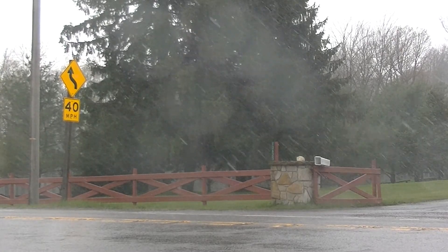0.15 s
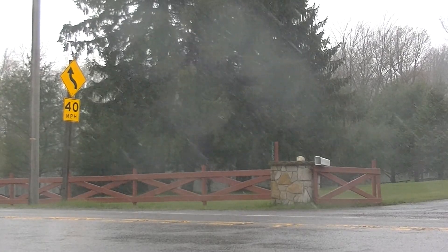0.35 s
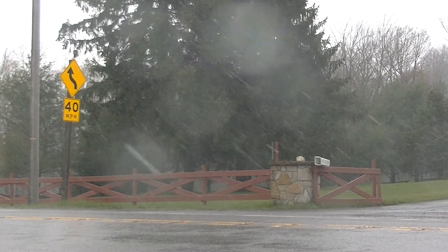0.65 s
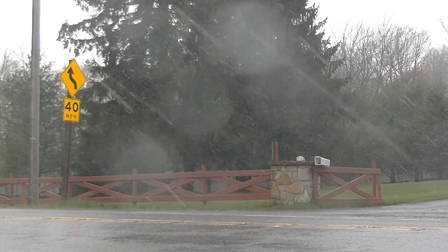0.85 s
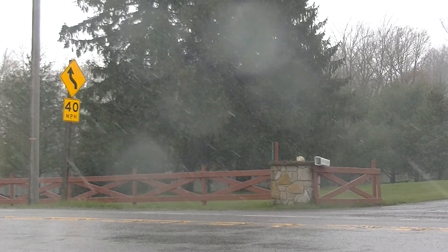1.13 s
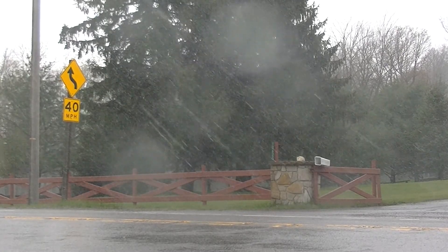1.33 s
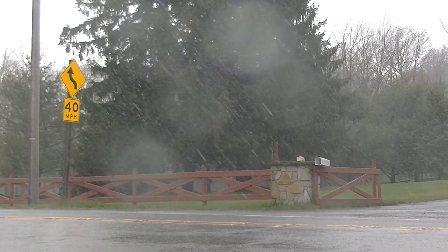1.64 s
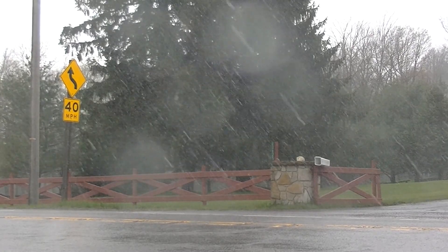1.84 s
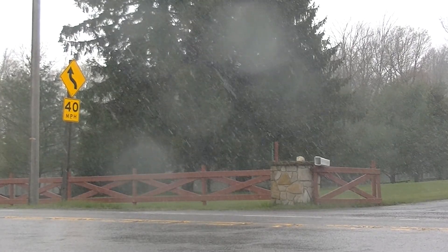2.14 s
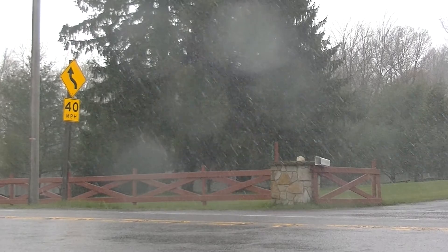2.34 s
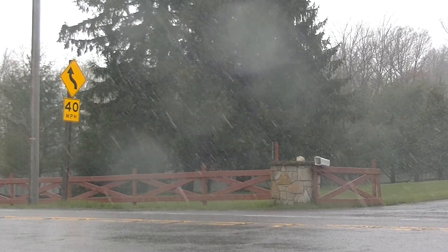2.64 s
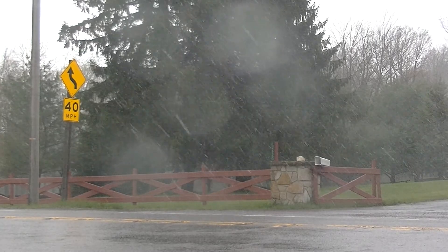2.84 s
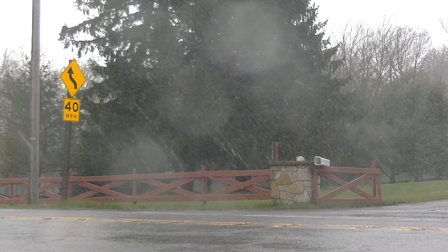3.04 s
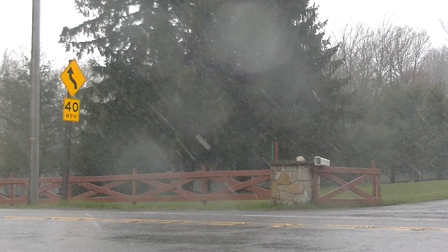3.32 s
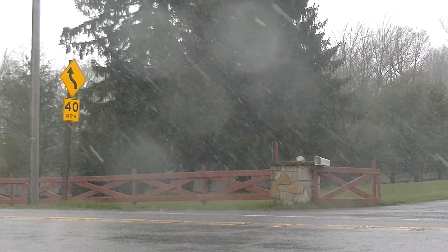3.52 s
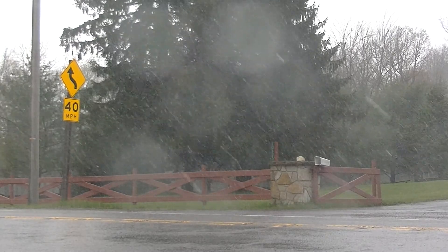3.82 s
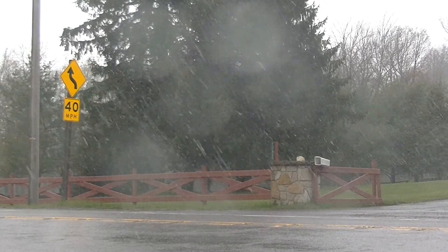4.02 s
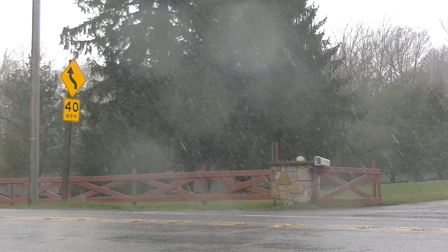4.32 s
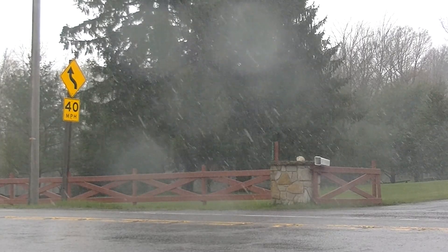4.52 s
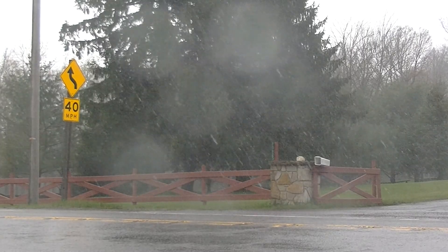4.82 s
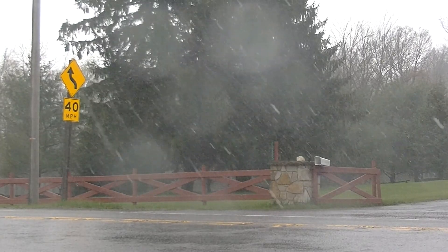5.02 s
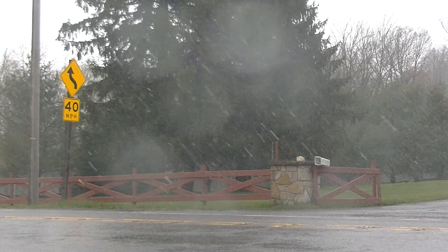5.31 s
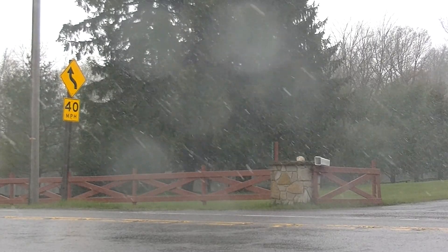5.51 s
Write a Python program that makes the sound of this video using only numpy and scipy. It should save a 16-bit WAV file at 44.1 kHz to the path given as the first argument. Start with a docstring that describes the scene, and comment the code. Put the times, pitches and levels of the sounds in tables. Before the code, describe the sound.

Icy pellets tick sharply and irregularly close to the microphone over a steady hiss of falling sleet, with buffeting wind fading early.

```python
"""Graupel beside a country road

Icy pellets, made of short coloured noise bursts, tick on and around the camera, mostly to its right.
Flurries of tiny ticks are fine crumbs; damped grainy pats are wet clumps and low bumps of wind.
Steady noise is the far fall; fluttering noise is a gust across the microphone ports that dies away.
Later a low distant rush comes up. Softer taps, a gritty rustle, a deep rumble and a brief hum fill in.
The recorder's gain control ducks for a moment after loud ticks, chopping the wind."""
import sys
import numpy as np
from scipy import signal
from scipy.fft import rfft, irfft, next_fast_len
from scipy.io import wavfile
from scipy.ndimage import uniform_filter1d, minimum_filter1d, map_coordinates

SR = 44100
rng = np.random.default_rng(int(sys.argv[2]) if len(sys.argv) > 2 else 0)


def dump(signal):
    """Clip the signal to [-1, 1] and save it as 16-bit WAV at the path in sys.argv[1]."""
    limited = np.clip(np.atleast_2d(signal).T, -1, 1)
    pcm = np.round(limited * 32767).astype(np.int16)
    wavfile.write(sys.argv[1], SR, pcm)


N = 249606  # length of the scene in samples

# Levels in the tables are before any trim; levels in the (frequency, level) tables are relative.
# far hiss of the fall: (time [s], level [dB])
FALL_LEVEL = [(0, -42), (1.8, -40.5), (2.3, -42.5), (4.2, -44), (4.8, -43), (5.28, -42.5), (5.42, -39.5),
              (5.54, -44.5)]
# colour of the far hiss: (frequency [Hz], level [dB])
HISS_COLOUR = [(100, -11), (300, -5), (500, 4), (1100, 4.5), (1600, 6.5), (2200, 5), (3000, 6), (4600, 6),
               (6100, 0), (7300, -9), (10000, -10.5), (16000, -12.5)]
# how alike left and right are, 1 = the same: (frequency [Hz], likeness [0 to 1])
LEFT_RIGHT_LIKENESS = [(1500, 0.9), (3000, 0.57), (5000, 0.36), (8000, 0.3), (11000, 0.12), (15000, 0.042)]
# strength of the gust: (time [s], level [dB])
WIND_LEVEL = [(0, -34.5), (.1, -27.5), (.19, -35.5), (.38, -27), (.485, -38), (.65, -31.5), (1.17, -34.5),
              (1.4, -28.5), (1.7, -38.5), (2.1, -45), (2.4, -45.5)]
# hard puffs within the gust: (middle [s], length [s], level [dB])
PUFFS = [(.085, 0.11, -30), (.136, 0.05, -22.5), (.243, 0.054, -21.5), (.308, 0.059, -20),
         (.422, 0.044, -23), (.458, 0.037, -24), (.513, 0.029, -22.5), (.562, 0.035, -24), (.618, .02, -27),
         (.665, 0.0088, -29.5), (.857, 0.047, -25.5), (.945, 0.032, -27), (1.064, 0.048, -21),
         (1.105, 0.036, -27), (1.275, 0.08, -27), (1.41, 0.042, -27.5), (1.457, 0.028, -23),
         (1.52, 0.013, -23.5), (1.615, 0.026, -30.5), (1.785, 0.06, -35.5), (2.062, 0.023, -34)]
# colour of the gust's blustering air: (frequency [Hz], level [dB])
BLUSTER_COLOUR = [(40, -63), (140, -33), (240, -15), (380, -4), (520, 0.5), (680, 0.5), (850, -4),
                  (1150, -9), (2000, -16), (3200, -24.5), (5000, -33), (8000, -56)]
# colour of the turbulence in the hardest puffs: (frequency [Hz], level [dB])
RASP_COLOUR = [(60, -44), (160, 0), (500, 4), (1500, 9), (2800, 3.5), (6000, -40), (10000, -47)]
# distant rush: (time [s], level [dB])
RUSH_LEVEL = [(0, -55), (1.8, -69), (2.2, -63), (4.1, -55), (4.26, -39.5), (4.38, -49.5), (4.8, -44.5),
              (5.2, -45.5), (5.66, -50)]
# colour of the distant rush: (frequency [Hz], level [dB])
RUSH_COLOUR = [(30, -22), (100, -8.5), (220, -1.5), (380, -1.5), (650, -6), (1100, -12.5), (2500, -85),
               (6000, -60)]
# deep rumble of moving air: (time [s], level [dB])
RUMBLE_LEVEL = [(0, -51), (.28, -50), (.34, -81), (1, -68), (1.06, -56), (1.95, -64), (2.1, -54.5),
                (2.45, -60.5), (2.7, -56), (3.05, -57), (3.4, -64.5), (4.7, -53), (5.66, -62)]
# colour of the deep rumble: (frequency [Hz], level [dB])
RUMBLE_COLOUR = [(10, -38), (25, -22), (38, -1.5), (60, -10), (90, -8), (160, -13), (500, -42)]
# showers of fine crumbs: (middle [s], length [s], level [dB])
SHOWERS = [(.61, .1, -43), (.8, .06, -39.5), (.95, .14, -38), (1.06, .07, -39.5), (1.27, .12, -38),
           (2.48, .16, -50), (2.81, .12, -43), (3.18, .14, -46), (3.62, .16, -45.5)]
# close pellets; level is over 1 ms, ring pitch belongs to the landing spot:
# (time [s], level [dB], brightness [dB per octave], crush time [s], ring pitch [Hz])
PELLETS = [(0.0242, -21, 2, 0.0025, 2380), (0.1574, -11.5, 5.5, 0.0007, 3500),
           (0.1689, -12, 5, 0.0013, 7680), (0.2027, -11.5, 3.5, 0.00016, 5060),
           (0.2191, -10, 4.5, 0.00078, 4940), (0.2612, -15, 3.5, 0.0015, 2330),
           (0.4446, -19, -1, 0.0016, 2320), (0.495, -20, -3, 0.001, 4400.0),
           (0.5094, -15.5, 3.5, 0.00072, 9300), (0.574, -12, 5.5, 0.0025, 3250),
           (0.6, -12.0, 3.5, 0.0008, 5960), (0.6276, -10, 4.5, 0.0013, 3380),
           (0.6585, -14, 5.5, 0.00018, 5940), (0.719, -18, -1, 0.0019, 2670),
           (0.7768, -16.5, 3, 0.0017, 2400.0), (0.781, -10.5, -3.5, 0.0027, 5560),
           (0.7865, -4.5, 8, 0.00071, 2400), (0.866, -9.5, 1, 0.0018, 6160),
           (0.878, -11, 7.5, 0.0017, 6800), (0.881, -6.5, 9.5, 0.000099, 7040),
           (0.9064, -17, 3, 0.0026, 3200.0), (0.9203, -20, 8, 0.00095, 2500),
           (0.928, -17, 7, 0.00067, 5250), (0.938, -15.5, 5, 0.00061, 2500.0),
           (0.95, -17.5, 7, 0.0026, 2600.0), (0.9566, -13, 6, 0.0018, 2510),
           (0.9626, -10.5, 4, 0.00023, 6200.0), (1.0004, -13, 9, 0.000096, 9050),
           (1.0129, -12, -2, 0.0018, 2300), (1.0198, -12, -1, 0.00061, 4200.0), (1.03, -6, 2, 0.0016, 3020),
           (1.0346, -9, -5, 0.0011, 3600), (1.0569, -13, 6, 0.0013, 2300.0),
           (1.0784, -20.0, -7, 0.0014, 9900.0), (1.1068, -19, 3, 0.0014, 7600),
           (1.1588, -11, 0.0, 0.0017, 8260), (1.1979, -13.0, 7, 0.0002, 3200.0),
           (1.236, -13, -5.5, 0.0014, 7550), (1.242, -10.5, 0, 0.0012, 6800),
           (1.2545, -15, 5, 0.00089, 2420), (1.2692, -17.5, 2, 0.0015, 2400.0),
           (1.288, -9.5, 0, 0.0012, 5340), (1.3075, -4.5, 2, 0.00021, 5060),
           (1.3264, -7.5, -6, 0.00038, 2900), (1.3409, -4, 0.5, 0.0016, 6800),
           (1.433, -11.5, -6.5, 0.00059, 5940), (1.4848, -24, 23, 0.00057, 8000),
           (1.5542, -16.5, 1.5, 0.0014, 2390), (1.5585, -15, 6, 0.0012, 2980),
           (1.5692, -17, 7, 0.0014, 6500.0), (1.601, -19.5, 1, 0.0016, 3050),
           (1.6333, -12.0, 2.5, 0.00011, 3800), (1.6409, -8.5, 3, 0.00038, 7760),
           (1.731, -14, 8, 0.00018, 2400), (1.7797, -16, 8, 0.0014, 8700),
           (2.157, -21.5, 2.5, 0.0004, 2400.0), (2.2608, -14.5, 7.5, 0.0018, 2510),
           (2.2892, -11.5, 5.5, 0.0011, 3600), (2.2948, -7, -3, 0.00061, 2540),
           (2.314, -15.5, 3, 0.00035, 7800), (2.38, -16, 1.5, 0.0012, 3500.0),
           (2.4058, -15.0, 2.5, 0.00012, 2280), (2.4389, -13, 0, 0.00062, 3540),
           (2.4638, -19.5, 7, 0.0013, 2800), (2.4963, -7.5, -0.5, 0.00023, 3200),
           (2.5125, -17, 1, 0.0014, 2290), (2.5234, -14.0, 2, 0.000083, 3780),
           (2.5677, -11.5, 0.5, 0.00036, 9300), (2.6394, -6.5, -1, 0.00062, 2800),
           (2.6656, -21, -2, 0.00046, 4040), (2.707, -22.5, -2, 0.00064, 4740),
           (2.771, -12.5, -4.5, 0.00038, 3150), (2.7794, -21, 3, 0.0016, 2300.0),
           (2.79, -21.0, -5, 0.0018, 4000.0), (2.8135, -21.5, 9, 0.0006, 6200.0),
           (2.847, -16, 4, 0.0018, 6500.0), (2.871, -9.0, -1.5, 0.000091, 5300),
           (2.8952, -15, 15.5, 0.001, 2700.0), (2.9656, -14, 9, 0.00023, 2640),
           (3.0615, -13, 3, 0.0014, 2200), (3.1198, -17.5, 3, 0.0019, 4000.0),
           (3.1307, -12, 6.5, 0.001, 8700.0), (3.1352, -6, -4, 0.00046, 5600),
           (3.1571, -13.0, 6, 0.00012, 3370), (3.1773, -12.5, 7, 0.0001, 6500.0),
           (3.194, -20.5, 4, 0.0007, 5070), (3.2052, -14.5, 4, 0.00012, 2320),
           (3.2301, -20.5, 8, 0.00065, 10800.0), (3.2429, -10.5, 2.5, 0.00034, 3020),
           (3.2471, -17.5, -5, 0.0011, 8400.0), (3.3083, -12, 2, 0.00015, 6360),
           (3.3382, -12.5, 1.5, 0.00075, 2490), (3.343, -6.5, -3, 0.00009, 4170),
           (3.3838, -15.5, 2.5, 0.001, 3160), (3.4504, -21.5, -2.5, 0.00067, 11000),
           (3.474, -15.5, 11, 0.0016, 2510), (3.5529, -22.5, 0, 0.0012, 3430),
           (3.5855, -8.5, -0.5, 0.00093, 3000), (3.592, -20.0, 19, 0.00018, 3200.0),
           (3.6121, -19.5, -1, 0.00048, 8400.0), (3.6204, -15.5, -5.5, 0.0013, 8000.0),
           (3.627, -15, 5, 0.00012, 2300.0), (3.6919, -19.5, 5, 0.0019, 2500),
           (3.7236, -15.5, 3.5, 0.0025, 4800.0), (3.743, -11, -1, 0.00017, 3150),
           (3.7973, -19, 0, 0.0013, 2400), (3.806, -18, 2, 0.002, 3900),
           (3.8211, -18.5, 5.5, 0.00089, 2320), (3.907, -16, 11.5, 0.00049, 3220),
           (3.9442, -12.5, 7, 0.000088, 6670), (4.007, -8.5, 10.5, 0.00019, 8200),
           (4.016, -16.5, 14, 0.00043, 6840), (4.1233, -18, 6.5, 0.00016, 5230),
           (4.2653, -21.0, 2, 0.00087, 5700.0), (4.276, -15.5, 0, 0.00025, 4400),
           (4.2873, -12, -12, 0.0025, 3040), (4.3166, -15.5, 5, 0.0016, 2830),
           (4.4335, -10.0, 0.5, 0.0032, 2940), (4.5256, -8.5, 0.5, 0.00041, 2870),
           (4.564, -22, 2, 0.00062, 5100), (4.575, -10.5, 5, 0.0011, 2400), (4.6464, -19, 1.5, 0.002, 5440),
           (4.7164, -22, 0.5, 0.00089, 6200.0), (4.7323, -8.5, 3.5, 0.0014, 4680),
           (4.7435, -16.5, 7, 0.0013, 2500.0), (4.9114, -21.5, 0.5, 0.0015, 2980),
           (4.9473, -8.0, 2.5, 0.0011, 4600), (4.9734, -11.5, 1, 0.0021, 4900),
           (5.0209, -10.0, 4.5, 0.00085, 6900), (5.096, -22, -2, 0.0003, 4460),
           (5.1035, -11.5, 1.0, 0.0014, 5660), (5.14, -15.5, 7.5, 0.0016, 6650),
           (5.247, -11.5, -1.5, 0.0011, 4950), (5.254, -19, -3, 0.0025, 3100),
           (5.45, -18.5, -2, 0.0023, 2310), (5.4582, -10.0, 3.5, 0.0019, 6100),
           (5.483, -15, 2.5, 0.0017, 2680), (5.5057, -10.5, 4, 0.0016, 2230), (5.611, -19, 5, 0.0016, 4240)]
# the hard surface that the pellets strike: (frequency [Hz], level [dB])
SURFACE_COLOUR = [(100, -27), (900, -21), (1600, -14.5), (2100, -3.5), (2700, 2.5), (5500, 0), (7500, -4),
                  (9300, -4.5), (11000, -11), (13000, -13), (14500, -16.5), (16500, -13.5)]
# share of a tick's left-right difference that is heard: (frequency [Hz], share [0 to 1])
SHADE_SHARE = [(1000, 0.37), (3000, 0.87), (5500, 0.59), (8500, 0.72), (11000, 0.5), (14000, 0.12)]
# soft wet clumps, and low bumps of wind on the microphone:
# (time [s], level [dB], pitch [Hz], decay time [s])
CLUMPS_AND_BUMPS = [(0.115, -33, 150, 0.005), (.134, -34, 170, 0.004), (0.243, -47, 121, 0.0058),
                    (.296, -17, 960, 0.001), (0.3208, -17, 1050, 0.00071), (1.16, -24, 1910, 0.0019),
                    (2.728, -23.5, 460, 0.0032), (2.729, -45, 128, 0.0055), (2.731, -34, 900, 0.014),
                    (2.748, -38, 260, 0.0046), (2.772, -21.5, 1460, 0.003), (4.29, -33, 2050, 0.005),
                    (4.434, -29.5, 1690, 0.005), (4.47, -32, 1850, 0.012), (4.478, -40, 3400, .008),
                    (4.699, -34, 2430, 0.005), (4.744, -31, 1160, 0.0063), (4.849, -50, 2950, 0.0044),
                    (5.105, -19.5, 1590, 0.0011), (5.199, -36, 2530, .007), (5.25, -34, 2200, 0.0089),
                    (5.443, -40, 2300, 0.01)]
# colour of the gritty rustle: (frequency [Hz], level [dB])
GRIT_COLOUR = [(300, -20), (1300, 1), (2800, 38), (5500, -10), (9000, -49), (15000, -4)]

TOP_HZ = 16100  # nothing is kept above this
TICK_SIZE, LEAD_S = 640, .002  # samples in a tick, and its time before the peak


def amp(db):
    """Turn decibels into gain."""
    return 10 ** (np.asarray(db) / 20)


def unit(x):
    """Scale to an rms (average strength) of 1."""
    return x / np.sqrt(np.mean(x ** 2) + 1e-20)


def along(points, hz):
    """Read (frequency, value) points on a log frequency axis."""
    f, v = np.transpose(points)
    return np.interp(np.log(hz + 1), np.log(f + 1), v)


def curve(rows):
    """Turn (time, value) rows into one value per sample."""
    return np.interp(np.arange(N) / SR, *np.transpose(rows))


def wobble(rate):
    """A smooth random curve with this many random points a second."""
    points = rng.standard_normal(int(N * rate / SR) + 4)
    return map_coordinates(points, [np.arange(N) * rate / SR])


def swells(rows, squareness=3):
    """Summed power of round-topped swells, given as (middle, length, level) rows."""
    t = np.arange(N) / SR
    return sum(amp(db) ** 2 * np.exp(-np.abs(2 * (t - s) / length_s) ** squareness)
               for s, length_s, db in rows)


def filtered(x, response):
    """Filter x by a response that depends on frequency."""
    n = x.shape[-1]
    m = next_fast_len(2 * n)
    return irfft(rfft(x, m) * response(np.fft.rfftfreq(m, 1 / SR)), m)[..., :n]


def causal(gain):
    """The response with this gain that rings only after it is struck."""
    cepstrum = irfft(np.log(gain + 1e-6))
    half = cepstrum.shape[-1] // 2
    fold = np.r_[1, np.full(half - 1, 2), 1, np.zeros(half - 1)]  # moves all ringing after the strike
    return np.exp(rfft(cepstrum * fold))


def pair(size, alike):
    """White noise for two ears, alike by the given correlation."""
    a, b = rng.standard_normal((2, size))
    turn = np.arccos(np.clip(alike, -1, 1)) / 2
    return np.cos(turn) * a + np.sin(turn) * np.array([b, -b])


def panned(balance_db):
    """Left and right gains of constant power; a negative balance leans right."""
    gains = amp(np.array([[.5], [-.5]]) * balance_db)
    return gains / np.sqrt(np.mean(gains ** 2, axis=0))


def noise(spectrum, alike):
    """Coloured stereo noise of rms 1."""
    return unit(filtered(pair(N, alike), lambda hz: amp(along(spectrum, hz))))


def ports(spectra, hz):
    """Mix two unrelated spectra into left and right, which grow less alike toward the top treble."""
    turn = np.arccos(np.clip(along(LEFT_RIGHT_LIKENESS, hz), -1, 1)) / 2
    shared, opposed = spectra[..., :1, :], spectra[..., 1:, :]
    return np.cos(turn) * shared + np.sin(turn) * opposed * np.array([[1], [-1]])


def add(track, s, sound):
    """Mix a sound into the track at time s."""
    start = int(np.clip(round(s * SR), 0, N - 1))
    track[:, start:start + sound.shape[1]] += sound[:, :N - start]


def far_fall(trim_db=-0.16, flutter_db=2.96):
    """Countless pellets on road, grass and branches merge into a hiss of coloured noise."""
    size = next_fast_len(N)
    hz = np.fft.rfftfreq(size, 1 / SR)
    spectra = rfft(rng.standard_normal((2, size)))
    hiss = irfft(ports(spectra, hz) * amp(along(HISS_COLOUR, hz)), size)[:, :N]
    level_db = curve(FALL_LEVEL) + trim_db + flutter_db * wobble(60)
    return amp(level_db) * panned(-1.3) * unit(hiss)


def gust(fade_db_per_s=20, rasp_db=-4.5, flutter_db=0.5):
    """Eddies break on each port separately, the right one more exposed; the hardest puffs turn raspy."""
    since_last_row_s = np.maximum(np.arange(N) / SR - WIND_LEVEL[-1][0], 0)
    wind_db = curve(WIND_LEVEL) - fade_db_per_s * since_last_row_s + flutter_db * wobble(25.07)
    strength_db = 10 * np.log10(amp(wind_db) ** 2 + swells(PUFFS))
    # each port flutters slowly and, more strongly, fast
    eddies = amp(np.array([1.0 * wobble(70) + 2.3 * wobble(260) for port in range(2)]))
    air = unit(filtered(eddies * pair(N, alike=0.16), lambda hz: causal(amp(along(BLUSTER_COLOUR, hz)))))
    rasp = unit(eddies ** 3.3 * noise(RASP_COLOUR, alike=0.15))
    # the rasp drops away quickly below the strongest moment
    excess_db = 1.94 * (strength_db - strength_db.max())
    return amp(strength_db) * (panned(-6.0) * air + amp(rasp_db + excess_db) * panned(-4) * rasp)


def distance():
    """A low rush from far along the road, over the deep rumble of moving air; both are coloured noise."""
    rush_db = curve(RUSH_LEVEL) + 3.1 * wobble(30)
    rush = amp(rush_db) * panned(-5.0) * noise(RUSH_COLOUR, alike=0.64)
    rumble = amp(curve(RUMBLE_LEVEL)) * panned(-0.82) * noise(RUMBLE_COLOUR, alike=0.77)
    return rush + rumble


def patter(level_db=-52.0, centre_hz=3000):
    """Wet pellets a few steps away tap on ground and twigs, each a short fading tone of its own pitch."""
    track, t = np.zeros((2, N)), np.arange(SR // 100) / SR
    taps_per_s, cycles = 130, 3.5  # a tap's life is counted in cycles of its own tone
    count = int(taps_per_s * N / SR)
    when = rng.random(count)  # as a share of the whole scene
    traits = np.clip(rng.standard_normal((count, 3)), -2, 2)
    for share, (size, pitch, side) in zip(when, traits):
        hz = centre_hz * np.exp(.3 * pitch)
        tap = np.sin(2 * np.pi * hz * t) * np.exp(-2 * hz * t / cycles)
        add(track, share * N / SR, amp(4 * size) * panned(4 * side - 2) * tap)
    return amp(level_db) * unit(track)


def ticks(db, bright, crush_s, ring_hz, balance_db, spot_db=6.5, spot_octaves=0.23,
          ring_db=-20, ring_s=0.002, crumble_db=-21, crumble_s=0.0011, pivot_hz=5000, ripple_db=2.0):
    """Stereo ticks: a pellet's porous shell crumbles, its core crushes, the surface rings briefly."""
    db, bright, crush_s, ring_hz, balance_db = (
        np.reshape(v, (-1, 1, 1)) for v in (db, bright, crush_s, ring_hz, balance_db))
    t, hz = np.arange(TICK_SIZE) / SR - LEAD_S, np.fft.rfftfreq(TICK_SIZE, 1 / SR)
    fade = lambda life_s: np.exp(-np.abs(t) / np.maximum(life_s, 1e-4))  # never shorter than 0.1 ms
    crumble = amp(crumble_db) * fade(crumble_s)
    crush_and_ring = np.hypot(fade(crush_s), amp(ring_db) * fade(ring_s))
    envelope = np.where(t < 0, crumble, crush_and_ring)
    force = envelope * rng.standard_normal((len(db), 2, TICK_SIZE))
    # each landing spot has one main resonance among weaker, broad ones
    ripple = signal.resample(rng.standard_normal((len(db), 1, 14)), len(hz), axis=-1)
    resonance_db = spot_db * np.exp(-(np.log2((hz + 1) / ring_hz) / spot_octaves) ** 2)
    # harder pellets are brighter: the colour tilts around the pivot
    tilt_db = bright * np.log2(np.maximum(hz / pivot_hz, .5))
    colour = amp(along(SURFACE_COLOUR, hz) + tilt_db + resonance_db + ripple_db * ripple)
    # the camera body shades the far port
    shade = amp(np.array([[.5], [-.5]]) * balance_db * along(SHADE_SHARE, hz))
    sound = irfft(ports(rfft(force), hz) * causal(colour) * shade * (hz < TOP_HZ))
    # level counts the whole tick's energy as if spread over 1 ms
    energy = np.sum(sound ** 2, axis=(1, 2), keepdims=True)
    return amp(db) * sound / np.sqrt(energy / (2 * SR / 1000))


def landed(times, sounds):
    """A stereo track with the peak of every tick at its time."""
    track = np.zeros((2, N))
    for s, sound in zip(times, sounds):
        add(track, s - LEAD_S, sound)
    return track


def flurry(calm_db=-60, debris_db=-36, debris_s=0.009):
    """Level of the crumbs in dB: a thin steady fall, passing showers, and debris of each close pellet."""
    t = np.arange(N) / SR
    # fragments are set relative to their pellet and keep landing for a moment
    debris = sum(amp(db + debris_db) ** 2 * (t > s) * np.exp(-np.abs(t - s) / debris_s)
                 for s, db, *_ in PELLETS)
    return 10 * np.log10(amp(calm_db) ** 2 + swells(SHOWERS) + debris)


def crumbs(flurry_db, trim_db=-1, bright=2.4, size_db=6, largest_db=-24, bright_spread=5.0,
           centre_hz=4200, side_db=-5, side_spread_db=3):
    """Tiny grains crackle between the pellets: a thicker flurry brings more, and they share its power."""
    mean_per_s, most_per_s, life_s = 90, 230, .0006  # mean is before the cap on the rate
    density = amp(flurry_db)
    per_s = np.minimum(mean_per_s * density / density.mean(), most_per_s)
    # a grain lands each time the running count passes its randomly shifted turn
    due = np.cumsum(per_s) / SR
    turns = np.arange(int(due[-1]))
    at = np.minimum(np.searchsorted(due, turns + rng.uniform(0, 1.5, len(turns))), N - 1)
    size = np.minimum(rng.exponential(size=len(at)), 2.5)
    hard, life, pitch, side = np.clip(rng.standard_normal((len(at), 4)), -2, 2).T
    db = flurry_db[at] - 10 * np.log10(per_s[at] / 1000) + size_db * size + trim_db
    grains = ticks(np.minimum(db, largest_db), bright + bright_spread * hard,
                   life_s * np.exp(0.38 * life), centre_hz * np.exp(.4 * pitch),
                   side_db + side_spread_db * side)
    return landed(at / SR, grains)


def pellets(trim_db=0.5, side_db=-8.5):
    """Pellets crush on the hard surface right beside the microphone, mostly to its right."""
    s, db, bright, crush_s, ring_hz = np.transpose(PELLETS)
    return landed(s, ticks(db + trim_db, bright, crush_s, ring_hz, side_db))


def clumps_and_bumps(sharpness=0.84, grain_db=4.5):
    """Dull, heavily damped, grainy pats of wet clumps, and low wind bumps on the microphone."""
    track, t = np.zeros((2, N)), np.arange(SR // 10) / SR
    for s, db, pitch, decay_s in CLUMPS_AND_BUMPS:
        # a broad resonance around the pitch, applied twice
        body = lambda hz: (1j * hz * pitch / (sharpness * (pitch ** 2 - hz ** 2) + 1j * hz * pitch)) ** 2
        grains = amp(grain_db * signal.resample(rng.standard_normal(50), len(t)))
        pat = filtered(np.exp(-t / decay_s) * grains * pair(len(t), alike=0.91), body)
        pat /= np.sqrt(np.sum(pat ** 2) / (2 * decay_s * SR))
        add(track, s, amp(db) * panned(-2.9) * pat)
    return track


def slush(flurry_db, level_db=-11, ripple_db=3.0):
    """Shattered pellets slide off with a gritty rustle, which grows faster than the flurry thickens."""
    grit = amp(ripple_db * wobble(360)) * noise(GRIT_COLOUR, alike=0.36)
    thickness_db = flurry_db + (flurry_db - flurry_db.max()) / 2
    return amp(level_db + thickness_db) * panned(-1) * unit(grit)


def hum(pitch_hz=37.8):
    """A very deep, slightly wavering tone swells briefly."""
    phase = 2 * np.pi * pitch_hz * np.arange(N) / SR + .5 * wobble(8.1)
    power = swells([(2.61, 0.16, -53)])  # (middle [s], length [s], level [dB])
    return np.sqrt(2 * power) * np.sin(phase)


def ducked(sound, treble_hz=2200, load_db=7, threshold_db=-22, slope=0.38, attack_s=0.0033,
           recover_db_per_s=300):
    """Gain control: a sharp tick slips through, then all dips and recovers; loud lows deepen the dip."""
    smooth = lambda x, s: signal.lfilter([1 / (s * SR)], [1, 1 / (s * SR) - 1], x)
    treble = filtered(sound, lambda hz: hz > treble_hz)
    lows = sound - treble
    treble_power = smooth(np.mean(treble ** 2, axis=0), .001)
    low_power = smooth(np.mean(lows ** 2, axis=0), .3)
    level_db = 10 * np.log10(treble_power + 1e-12) + load_db * np.sqrt(low_power / low_power.max())
    wanted_cut_db = slope * np.maximum(level_db - threshold_db, 0)  # slope: dB of cut per dB over
    # the cut jumps up at once but shrinks only at the recovery speed; smoothing then delays it
    recovery_db = recover_db_per_s * np.arange(N) / SR
    cut_db = np.maximum.accumulate(wanted_cut_db + recovery_db) - recovery_db
    return sound * amp(-smooth(cut_db, attack_s))


def scene():
    """Near ticks over the far fall, wind and distance."""
    flurry_db = flurry()
    background = far_fall() + gust() + distance() + patter()
    near = crumbs(flurry_db) + pellets() + clumps_and_bumps() + slush(flurry_db)
    return background + near + hum()


def record(dry, ceiling=.97, reaction=45):
    """The recorder ducks and drops the top treble; a fast limiter holds down the sharpest peaks."""
    in_band = lambda x: filtered(x, lambda hz: hz < TOP_HZ)
    sound = in_band(ducked(dry))
    needed = ceiling / np.maximum(np.abs(sound), ceiling)
    # reaction in samples: the gain drops around each peak and is then smoothed
    gain = uniform_filter1d(minimum_filter1d(needed, 2 * reaction + 1), reaction)
    return in_band(sound * gain)


dry = scene()
out = record(dry)
dump(out)
```